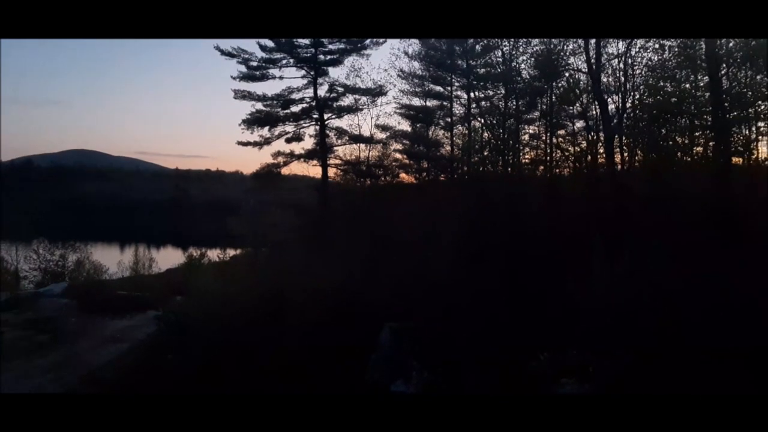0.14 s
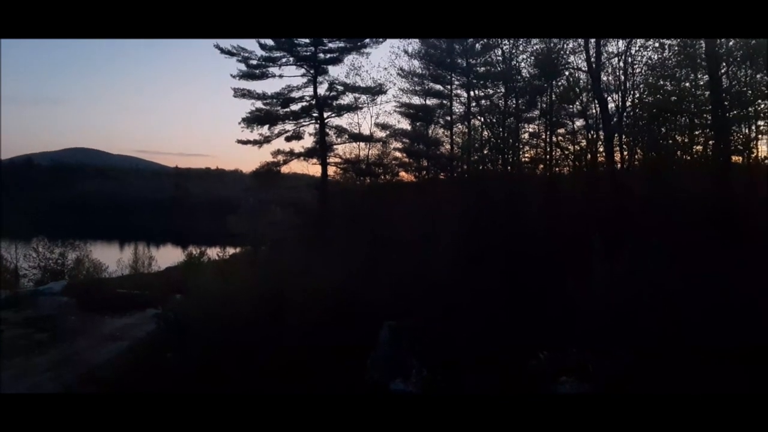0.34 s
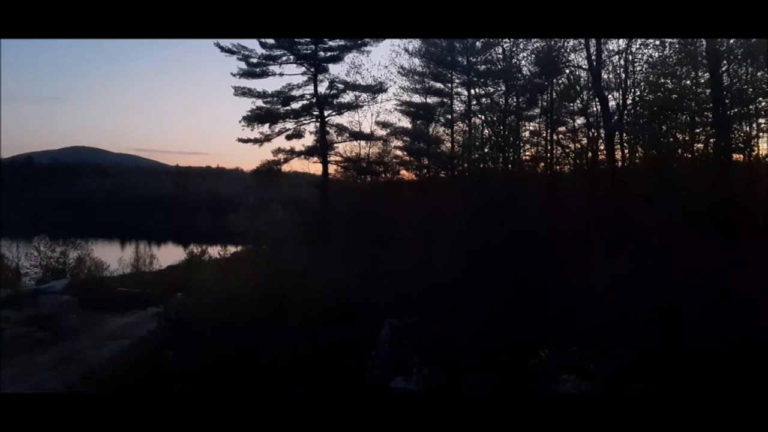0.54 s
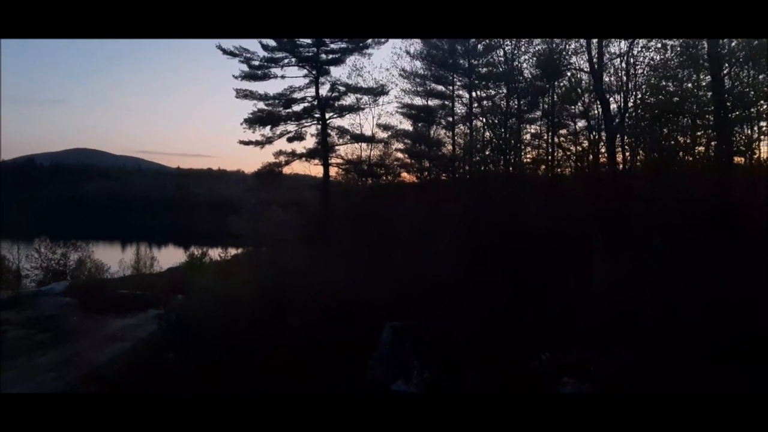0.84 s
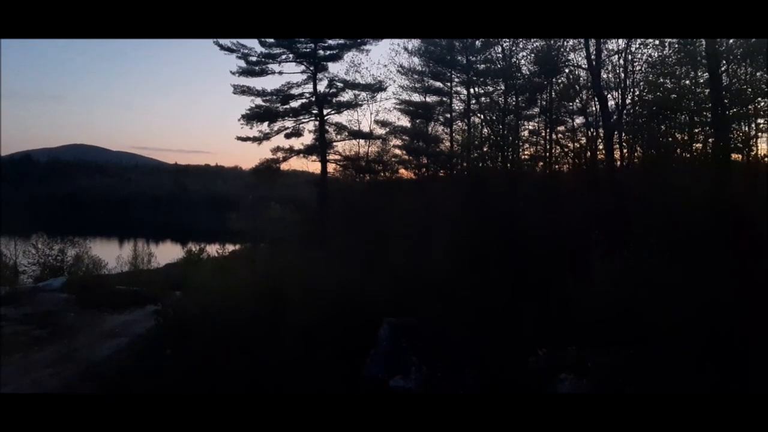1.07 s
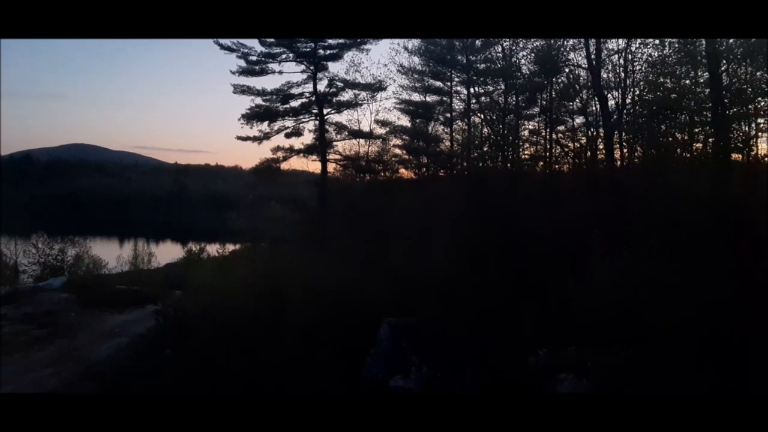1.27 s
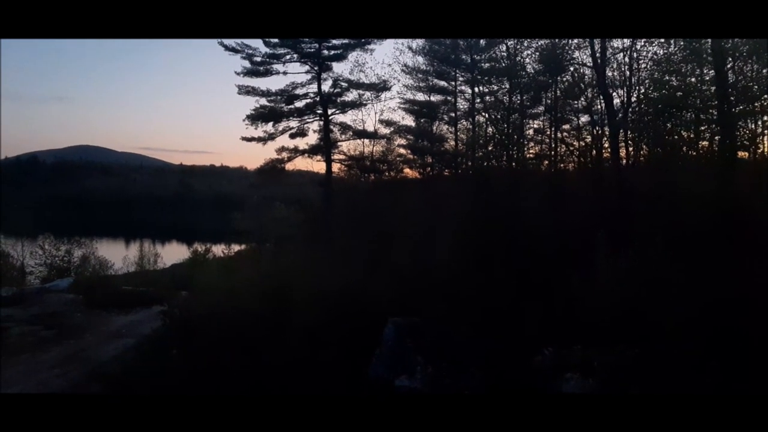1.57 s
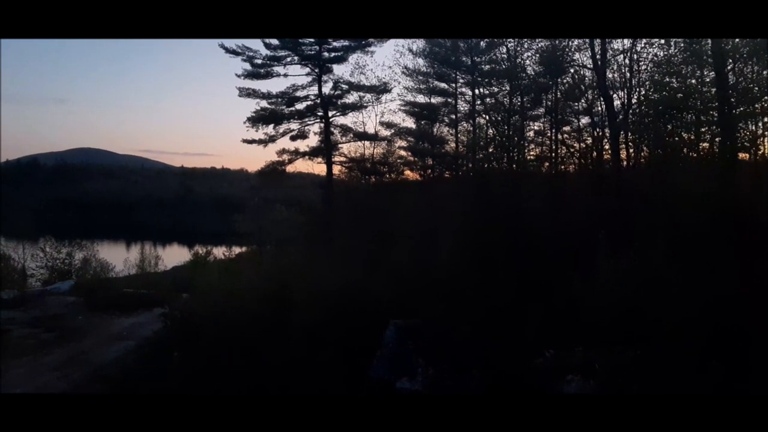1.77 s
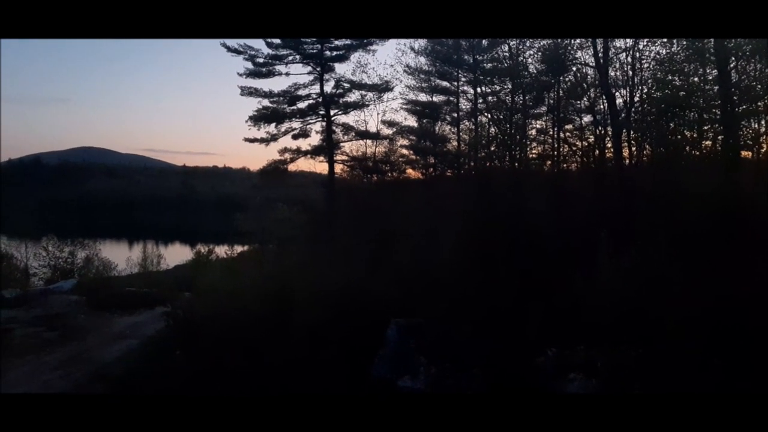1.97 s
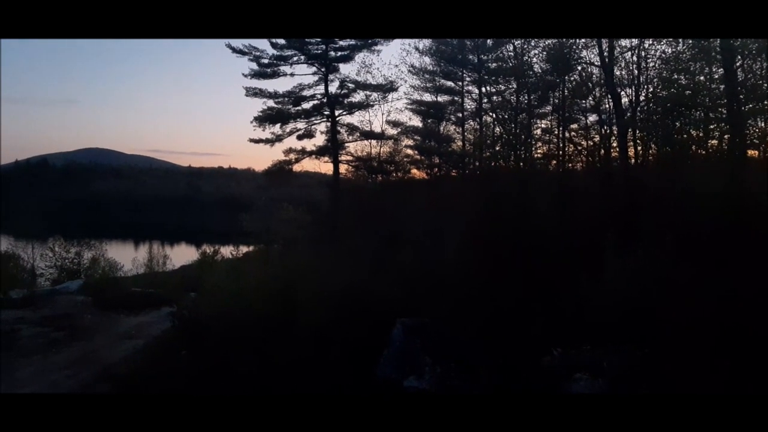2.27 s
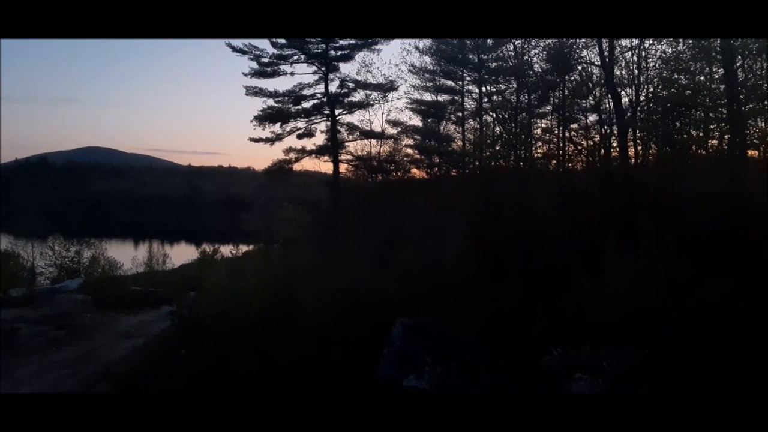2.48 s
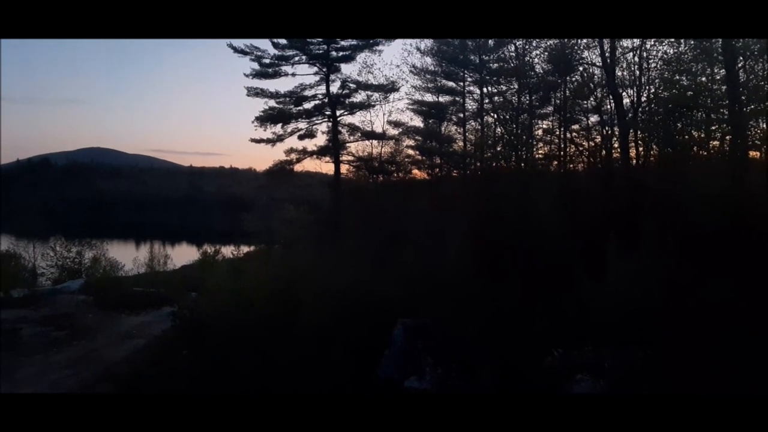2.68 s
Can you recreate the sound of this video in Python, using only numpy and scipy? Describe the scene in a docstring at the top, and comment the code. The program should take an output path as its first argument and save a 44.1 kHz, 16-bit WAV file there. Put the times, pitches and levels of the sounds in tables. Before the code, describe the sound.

A whip-poor-will dominates, slightly right: the end of one call rings at the start, then full calls begin near 0.3, 1.3 and 2.4 s, the last cut off in its final syllable or echo. Each has a strong low whistle, a pause, a softer warble and a whiplash up-and-down sweep near 1.6-2.7 kHz, echoing among trees. Frogs peep continuously left around 3 kHz; faint bird notes, dry ticks, rustles and hiss.

```python
"""Whip-poor-will at the edge of a wood

A whip-poor-will by a lake at dusk repeats a three-part whistle, a gliding sine with faint raspy overtones.
Trunks scatter it into a short flutter and a longer tail, made by convolution with decaying noise.
Small frogs peep in rising sine notes, and distant birds whistle faintly in sliding ones.
Dry ticks and rustles are noise under decaying envelopes; still air and microphone hiss are filtered noise."""
import sys
import numpy as np
from scipy import signal
from scipy.fft import rfft, irfft
from scipy.io import wavfile
from scipy.ndimage import uniform_filter1d, map_coordinates

SR = 44100
rng = np.random.default_rng(int(sys.argv[2]) if len(sys.argv) > 2 else 0)


def persist_wave(psi):
    """Save psi, clipped to +-1, as 16-bit WAV."""
    counts = np.round(np.clip(psi, -1, 1) * 32767).astype(np.int16)
    wavfile.write(sys.argv[1], SR, np.atleast_2d(counts).T)


N = 124362

# Starts of the calls: start_s (negative: before the sound begins)
CALL_STARTS_S = [-.808, .281, 1.323, 2.392]
# Glides of the three syllables: time_s (after the call starts), pitch_hz, level_db (relative to BIRD_DB)
WHIP_GLIDE = [(.035, 1295, -22), (.046, 1310, -11), (.061, 1430, -4.5), (.071, 1620, -2), (.088, 1660, 6.5),
              (0.113, 1710, -5.5), (.132, 1690, 2), (0.147, 1637, 2), (.153, 1560, -26.5)]
POOR_GLIDE = [(0.359, 1130, -30), (0.407, 1160, -21), (.452, 1254, -18.5), (.461, 1440, -10),
              (0.51, 1486, -3.5), (0.518, 1336, -10.5), (0.535, 1277, -11), (0.548, 1493, -2.5),
              (0.574, 1551, -9.5), (.602, 1491, -7.5), (.615, 1318, -6.5), (.634, 1523, -8.5),
              (0.653, 1610, 4), (0.663, 1443, -7.5)]
WILL_GLIDE = [(.679, 1676, -1.5), (0.691, 1933, -5.5), (.708, 2310, 0), (.720, 2693, -5),
              (.729, 2657, -4.5), (.740, 2231, 0), (.755, 1962, 5), (.771, 1782, 5.5), (.784, 1634, -2),
              (0.791, 1480, -13.5)]
# The ground's reflection favours one ear or the other with pitch: pitch_hz, left_minus_right_db
EAR_BALANCE = [(1200, 1.5), (1450, 4.5), (1560, -1.5), (1680, -2.5), (2000, -6.5), (2700, -4)]
BIRD_DB, LEFT_LAG_S, OVERTONE_T60_S = -41, .000245, 0.28


def nightjar(t):
    """Interaural time and level differences place the bird; its overtones arrive only as scatter."""
    voice = np.zeros((2, len(t)))
    for start in CALL_STARTS_S:
        now = (t >= start) & (t < start + 1)
        age = t[now] - start
        # "whip", a pause, then a warbled "poor" that runs into the whiplash "will"
        call = whistle(age, WHIP_GLIDE) + whistle(age, POOR_GLIDE + WILL_GLIDE)
        voice[:, now] += undb(BIRD_DB) * call
    song, overtones = voice

    # the sound reaches the left ear later, so the bird sits to the right
    late_song = map_coordinates(song, [np.arange(len(t)) - LEFT_LAG_S * SR], order=3)
    left = colour(late_song, [(hz, db / 2) for hz, db in EAR_BALANCE])
    right = colour(song, [(hz, -db / 2) for hz, db in EAR_BALANCE])
    direct = np.array([left, right])
    return direct + wood(song) + echoes(overtones, OVERTONE_T60_S, 0, ECHO_COLOUR)


# Spectrum of the rasp: frequency_hz, level_db (relative)
RASP_COLOUR = [(500, -14.5), (4000, -3.5), (8000, -9), (12000, -3.5), (16000, -9)]
WAVER, FLUTTER_DB = 0.0049, 1.76  # scale of random pitch (fraction) and level wandering
TRILL_HZ, TRILL_DEPTH, TRILL_DB = 79, .035, 5  # rate, pitch swing (fraction), level swing
TRILL_CENTRE_S, TRILL_WIDTH_S = .696, .019
STRAIN_HZ = 2680  # overtones and rasp grow steeply as the pitch nears this
SECOND_DB, THIRD_DB, RASP_DB = -28.5, -30.5, -23  # gains when the pitch equals STRAIN_HZ


def whistle(t, glide):
    """Frequency modulation: phase integrates a gliding pitch; returns the tone and its raspy overtones."""
    s, pitch_hz, level_db = np.array(glide).T
    # a brief trill on the final rise sways pitch and level together
    from_trill = t - TRILL_CENTRE_S
    trill = np.exp(-(from_trill / TRILL_WIDTH_S) ** 2) * np.cos(2 * np.pi * TRILL_HZ * from_trill)

    smooth_hz = uniform_filter1d(np.interp(t, s, pitch_hz), size=200)
    hz = smooth_hz * (1 + WAVER * walk(250, len(t)) + TRILL_DEPTH * trill)
    phase = 2 * np.pi * np.cumsum(hz) / SR

    gate = uniform_filter1d(((t > s[0]) & (t < s[-1])) * 1., size=180)
    gain_db = np.interp(t, s, level_db) + FLUTTER_DB * walk(119.9, len(t)) + TRILL_DB * trill
    gain = np.sqrt(2) * gate * undb(gain_db)

    second = undb(SECOND_DB) * np.sin(2 * phase)
    third = undb(THIRD_DB) * np.sin(3 * phase)
    rasp = undb(RASP_DB) * colour(rng.standard_normal(len(t)), RASP_COLOUR)
    overtones = (hz / STRAIN_HZ) ** 4 * (second + third + rasp)
    return gain * np.array([np.sin(phase), overtones])


# Spectra of the two sets of echoes: frequency_hz, level_db (relative)
SCATTER_COLOUR = [(1000, -26), (1400, -5.5), (1700, -11.5), (2100, 0), (2700, 4.5), (5000, -3)]
ECHO_COLOUR = [(1000, 3), (1400, -4), (1700, -8), (2100, -1), (2700, 4.5), (5000, 0.5), (9000, 6)]
SCATTER_T60_S, SCATTER_DB = 0.23, -0.5
TAIL_T60_S, TAIL_DB = 1.314, -6  # echo levels are set before colouring


def wood(x):
    """Multiple scattering: quick flutter from near trunks and a long tail from the far ones."""
    scatter = echoes(x, SCATTER_T60_S, SCATTER_DB, SCATTER_COLOUR)
    tail = echoes(x, TAIL_T60_S, TAIL_DB, ECHO_COLOUR)
    return scatter + tail


ECHO_ONSET_S = 0.004


def echoes(x, t60_s, db, tint):
    """Convolution with exponentially decaying noise: dense reflections, different in each ear."""
    t = np.arange(SR) / SR  # the response is cut at one second
    decay = np.exp(-np.log(1000) * t / t60_s) * (1 - np.exp(-t / ECHO_ONSET_S))
    response = undb(db) * rng.standard_normal((2, SR)) * decay / np.linalg.norm(decay)
    return signal.fftconvolve(x[None], colour(response, tint), axes=-1)[:, :len(x)]


# Notes of the nearer frogs: start_s, pitch_hz (at the start), level_db (before panning and swell)
NEAR_PEEPS = [(0.211, 3130, -59), (.33, 3170, -57.5), (.435, 2930, -54), (0.541, 3250, -65),
              (.845, 3030, -50.5), (.875, 2990, -54.5), (1.055, 3000, -51.5), (1.085, 3110, -58.5),
              (1.529, 2950, -57.5), (1.765, 3050, -52.5), (1.801, 3247, -61), (1.929, 3060, -60),
              (2.158, 2900, -59), (2.248, 3100, -55.5), (2.362, 3000, -57), (2.647, 3020, -52),
              (2.681, 3150, -56.5)]
PEEP_PAN_DB, FROG_ECHO_DB = 9, -10  # left minus right; gain of the near frogs' echoes
CHORUS_PER_S, CHORUS_HZ, CHORUS_SPREAD_HZ = 320, 2967, 140
CHORUS_REACH = 1.9  # the far frogs' pitches stay within this many spreads of the centre
CHORUS_SCATTER_DB = 3  # spread of level from note to note
CHORUS_DB, CHORUS_PAN_DB = -50.5, 7  # rms before panning; left minus right


def frogs(t):
    """Superposition: a few near frogs over a crowd of far ones along the shore to the left."""
    near = peeps(t, NEAR_PEEPS)
    near = near + undb(FROG_ECHO_DB) * wood(near)

    slots = np.arange(t[0], t[-1], 1 / CHORUS_PER_S)
    when, pitch, size = rng.standard_normal((len(slots), 3)).T
    starts = slots + when / CHORUS_PER_S
    hz = CHORUS_HZ + CHORUS_SPREAD_HZ * np.clip(pitch, -CHORUS_REACH, CHORUS_REACH)
    far = wood(peeps(t, zip(starts, hz, CHORUS_SCATTER_DB * size)))  # heard only as echoes
    return near * pan(PEEP_PAN_DB) + level(far, CHORUS_DB) * pan(CHORUS_PAN_DB)


PEEP_S, PEEP_RISE_HZ = 0.09457, 217.6


def peeps(t, notes):
    """Linear chirps: short pure notes that swell and fade as they slide upward."""
    out = np.zeros(len(t))
    u = np.arange(int(PEEP_S * SR)) / (PEEP_S * SR)  # 0 to 1 through the note
    swell = np.sin(np.pi * u)
    for start, hz, db in notes:
        i = max(int((start - t[0]) * SR), 0)
        phase = 2 * np.pi * np.cumsum(hz + PEEP_RISE_HZ * u) / SR
        note = undb(db) * np.sqrt(2) * swell * np.sin(phase)
        out[i:i + len(u)] += note[:len(out[i:i + len(u)])]
    return out


# Whistled notes: start_s, length_s, start_hz, end_hz, level_db (before swell and echoes), buzz (0-1)
FAR_NOTES = [(.355, 0.064, 2270, 2320, -59.5, 0), (1.38, .11, 2208, 2220, -56.5, 0.05),
             (1.475, 0.059, 2316, 2340, -59, 0.06), (1.472, 0.19, 2573, 2660, -60, 0.04),
             (1.392, 0.15, 4240, 4705, -62.5, 0.05), (1.75, 0.19, 4060, 4600, -70, .07),
             (1.831, 0.027, 1970, 1880, -55, .01), (2.255, .17, 4110, 4600, -71.5, 0.09),
             (2.417, .12, 4260, 5090, -65.5, 0.1), (2.657, 0.13, 2628, 2740, -61, 0.05),
             (2.727, 0.15, 2520, 2600, -62, 0), (2.747, 0.12, 4350, 4600, -66.5, 0.12)]
FAR_T60_S = 0.54


def far_birds(t):
    """Reverberant field without direct sound: thin sliding notes from deep in the wood, most high ones buzzy."""
    out = 0
    waver = walk(400, len(t))
    for start, length, from_hz, to_hz, db, buzz in FAR_NOTES:
        u = np.clip((t - start) / length, 0, 1)
        hz = (from_hz + (to_hz - from_hz) * u) * (1 + buzz * waver)
        phase = 2 * np.pi * np.cumsum(hz) / SR
        out = out + undb(db) * np.sin(np.pi * u) * np.sin(phase)
    return echoes(out, FAR_T60_S, 0, ECHO_COLOUR)


# Dry ticks, each with a rustle: start_s, tick_level_db, rustle_level_db (before build-up and decay)
TICKS = [(0.882, -58, -62), (1.252, -60, -64.5), (1.538, -62, -67), (1.555, -55, -62.5),
         (1.884, -56, -57.5), (2.119, -53, -68), (2.262, -71, -60), (2.51, -89, -65.5), (2.73, -74, -68)]
# Spectrum of ticks and rustles: frequency_hz, level_db (relative)
TICK_COLOUR = [(300, -8), (2000, 0), (4200, 6.5), (6000, -8), (9000, -7), (15000, -4)]
TICK_DECAY_S, RUSTLE_ATTACK_S, RUSTLE_DECAY_S = 0.0034, 0.01, 0.048  # time constants


def ticks(t):
    """Impulsive noise: small dry snaps that decay exponentially and trail off in a rustle."""
    envelope = 0
    for start, tick_db, rustle_db in TICKS:
        age = np.maximum(t - start, 0)
        tick = (t > start) * np.exp(-age / TICK_DECAY_S)
        rustle = (1 - np.exp(-age / RUSTLE_ATTACK_S)) * np.exp(-age / RUSTLE_DECAY_S)
        envelope = envelope + undb(tick_db) * tick + undb(rustle_db) * rustle
    return envelope * level(colour(rng.standard_normal((2, len(t))), TICK_COLOUR), 0)


# Spectra of air and microphone hiss: frequency_hz, level_db (per Hz, relative)
AIR_COLOUR = [(20, -22), (45, -16), (65, -1.5), (80, 5), (98, 0.5), (120, 3), (145, 0), (230, 2),
              (400, -2.5), (1000, -4), (2200, -3.5), (3100, 9.5), (3800, -5), (4500, -10.5), (5600, -16.5),
              (8000, -27), (16000, -41)]
HISS_COLOUR = [(20, -32), (200, -20), (5000, -12.5), (7000, -20.5), (9000, -24), (10000, -12), (11200, -3),
               (13000, -3), (16000, -2)]
AIR_DB, AIR_PAN_DB, HISS_DB = -65.5, 4.5, -68  # rms before panning; left minus right; rms
AIR_LIKENESS = 0.16  # power of the noise shared by both ears, relative to each ear's own


def background():
    """Partial coherence: still evening air shares some noise between the ears, microphone hiss none."""
    air = rng.standard_normal((2, N)) + np.sqrt(AIR_LIKENESS) * rng.standard_normal(N)
    hiss = rng.standard_normal((2, N))
    air = level(colour(air, AIR_COLOUR), AIR_DB) * pan(AIR_PAN_DB)
    return air + level(colour(hiss, HISS_COLOUR), HISS_DB)


def undb(db):
    """Logarithmic level: decibels to amplitude gain."""
    return 10 ** (np.asarray(db) / 20)


def level(x, db):
    """Mean-square level: scale to an rms in decibels."""
    return x * undb(db) / np.sqrt(np.mean(x ** 2))


def pan(db):
    """Interaural level difference: left and right gains, left louder when positive."""
    return undb(np.array([[db], [-db]]) / 2)


def colour(x, points):
    """Linear filtering: weight the spectrum by a curve of (Hz, dB) points, joined on a log frequency axis."""
    hz, db = np.array(points, float).T
    f = np.maximum(np.fft.rfftfreq(x.shape[-1], 1 / SR), 1)
    gain = undb(np.interp(np.log(f), np.log(hz), db))
    return irfft(rfft(x) * gain, x.shape[-1])


def walk(rate, size):
    """Band-limited noise: smooth random wandering with a spread near 1, redrawn at rate in Hz."""
    k = max(int(SR / rate), 1)
    steps = np.repeat(rng.standard_normal(size // k + 1), k)
    return uniform_filter1d(steps, k)[:size]


def scene():
    """Superposition: bird and frogs start a second early, so their echoes already hang in the air."""
    t = np.arange(-SR, N) / SR
    callers = (nightjar(t) + frogs(t))[:, SR:]
    return callers + far_birds(t[SR:]) + ticks(t[SR:]) + background()


TOP_HZ = 15700


def record(dry):
    """Low-pass filtering: the recorder cuts the top steeply."""
    low_pass = signal.ellip(10, .1, 70, TOP_HZ, fs=SR, output="sos")  # order, ripple dB, rejection dB
    return signal.sosfilt(low_pass, dry)


dry = scene()
out = record(dry)
persist_wave(out)
```